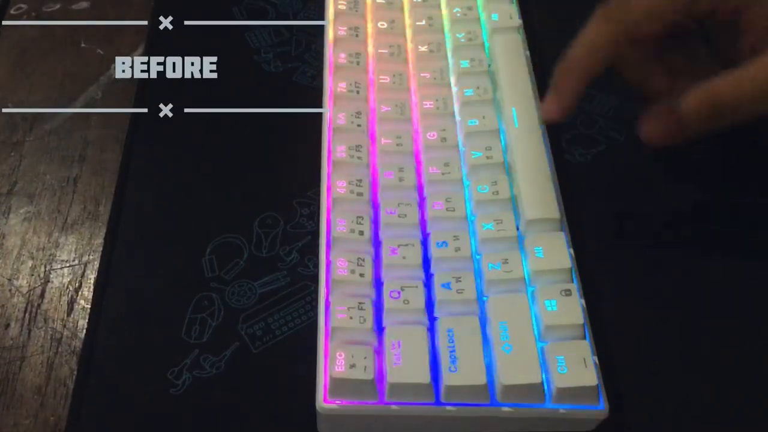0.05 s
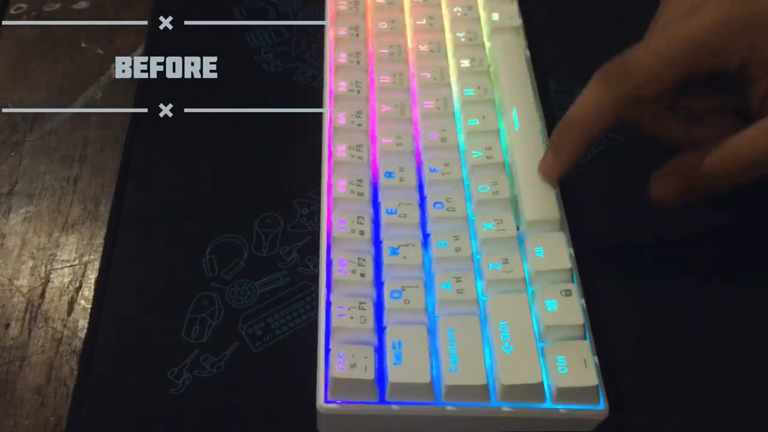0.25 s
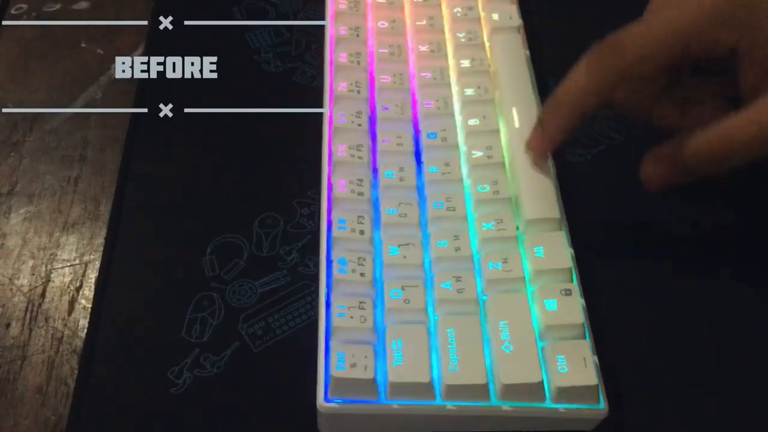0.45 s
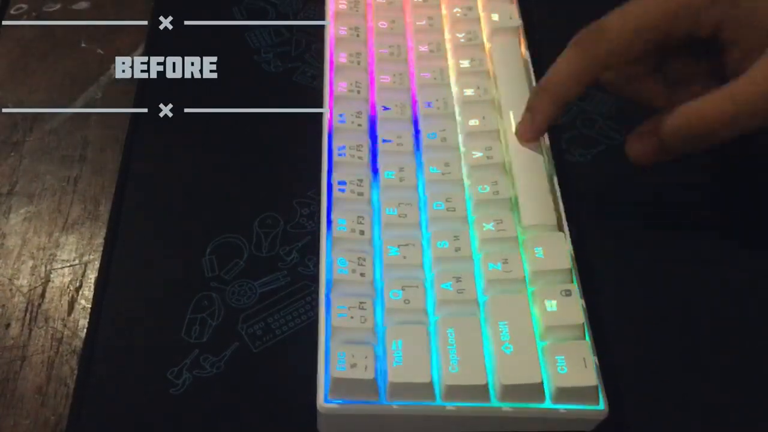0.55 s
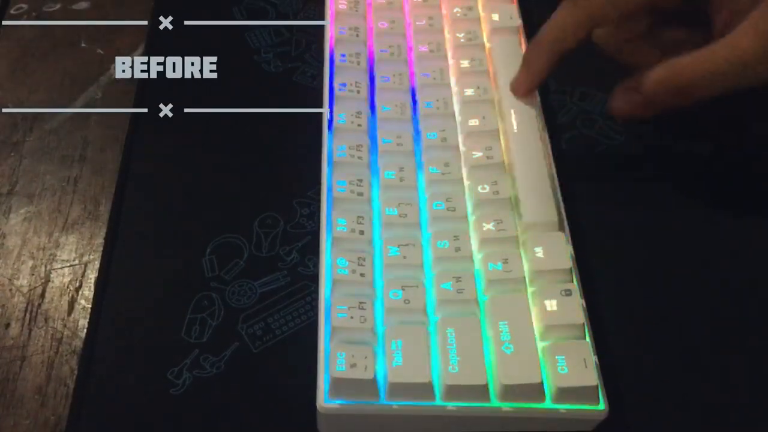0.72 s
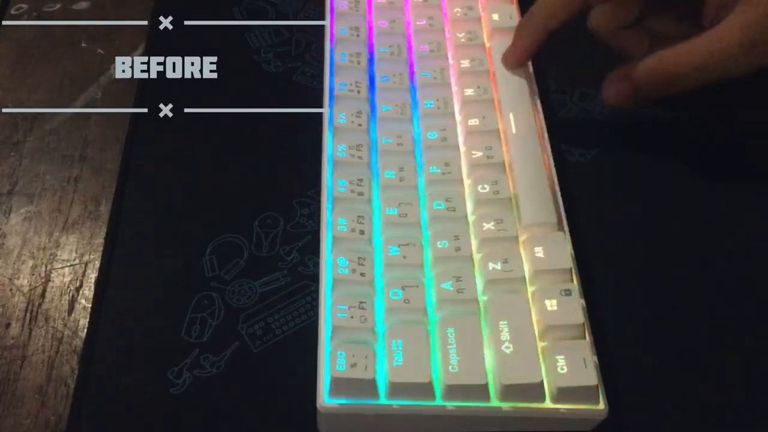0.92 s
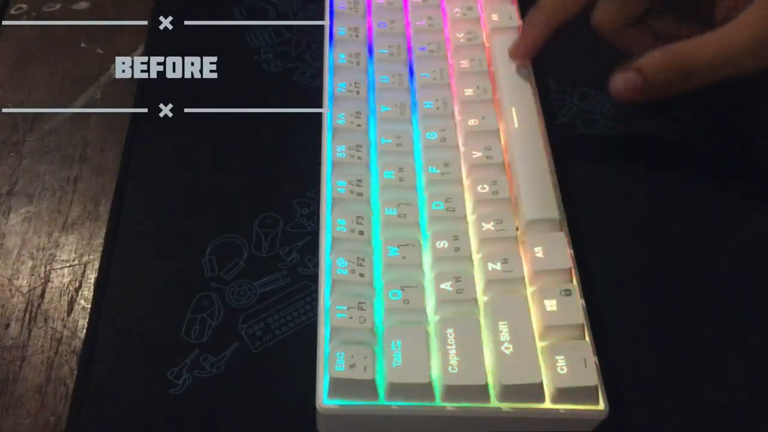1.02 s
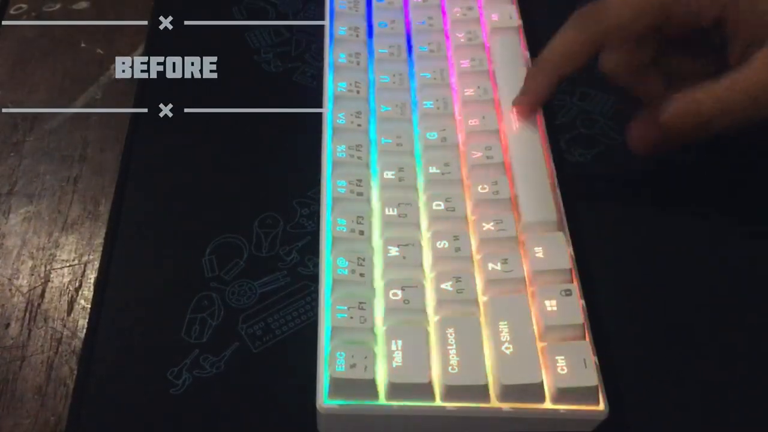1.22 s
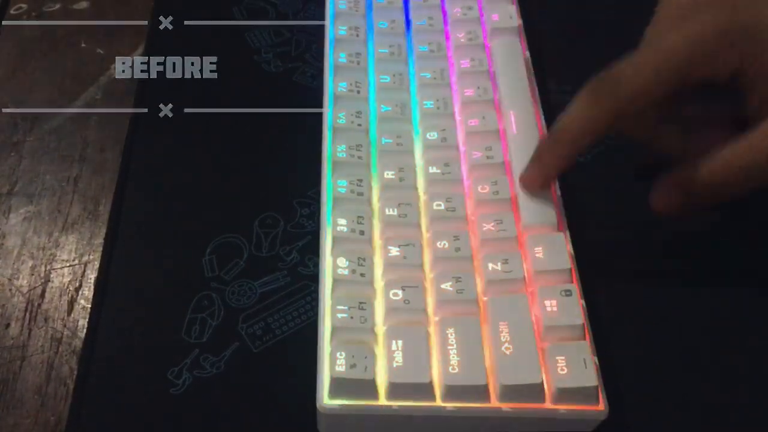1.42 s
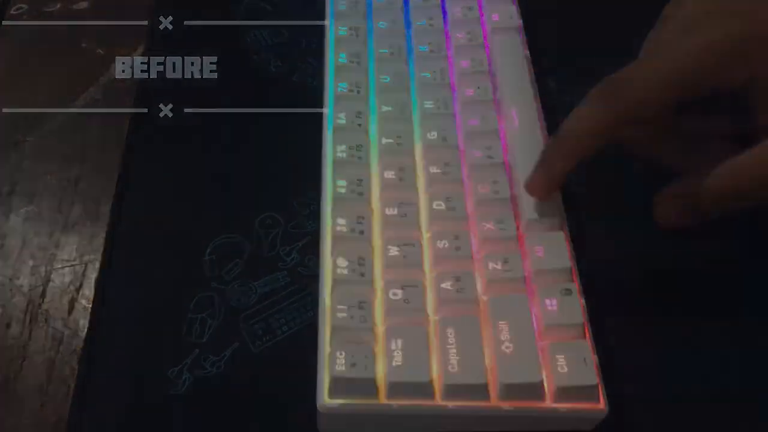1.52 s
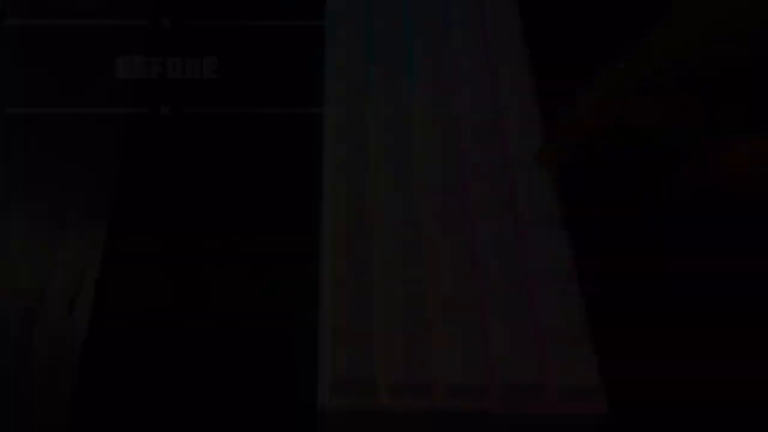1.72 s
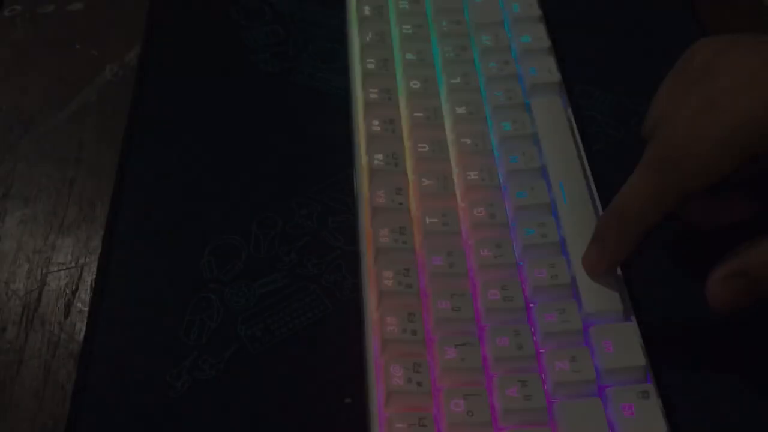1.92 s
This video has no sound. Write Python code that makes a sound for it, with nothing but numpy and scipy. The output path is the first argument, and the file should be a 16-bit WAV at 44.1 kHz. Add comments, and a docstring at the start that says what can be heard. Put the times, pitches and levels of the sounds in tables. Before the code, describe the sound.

Rapid, even clacking of a space bar on a mechanical keyboard in a quiet room.

```python
"""Space bar tapping

A finger taps a mechanical keyboard's space bar about six times a second, on a desk in a small quiet room.
The first stroke bottoms out hard and shakes the desk; later ones only click on the way down.
On each return the bar snaps against its stop, knocks the case and bounces. Low noise and hum lie beneath.
The level fades out near the end, then starts to return."""
import sys
import numpy as np
from scipy import signal
from scipy.fft import rfft, irfft, next_fast_len
from scipy.io import wavfile
from scipy.ndimage import map_coordinates

SR = 44100
rng = np.random.default_rng(int(sys.argv[2]) if len(sys.argv) > 2 else 0)


def master_out(mix):
    """Clip the mix to full scale and print it as 16-bit PCM to the path in sys.argv[1]."""
    frames = np.transpose(np.atleast_2d(mix))
    ceiling = np.clip(frames, -1, 1)
    pcm = np.round(ceiling * 32767).astype(np.int16)
    wavfile.write(sys.argv[1], SR, pcm)


N = 85995
HIT_T_S = np.arange(SR // 3) / SR  # time axis of one impact
TICK_HOLD_S, TICK_T60_S = .003, .021
LEAF_LEAD_S = .012  # switch leaf ticks ahead of the stop

# bar returns (time [s], level [dB], snap re level [dB], first flight [s], bounce re level [dB])
RETURNS = [(.2863, -20.5, -0.5, .0072, -13), (.4673, -19.5, 0, .0083, -12), (.6434, -21, 0, .0079, -11),
           (.8208, -23.5, -0.5, .0086, -4), (1.0010, -22.5, 0.5, .0083, -7),
           (1.1736, -23.5, -0.5, .0078, -9), (1.3480, -19, -.5, .0090, -7), (1.5186, -21, -1.5, .0085, -9),
           (1.6738, -22, -1, .0083, -12), (1.8660, -30, -4, .0058, -7)]
# case and plate (frequency [Hz], level [dB], t60 [s])
CASE_MODES = [(247, -22, .16), (313, -22, .12), (400, -20, .018), (610, -22, .07), (690, -9, .028),
              (724, -26, .1), (772, -18, .09), (1336, -25, .2), (1478, -16, .11), (1702, 4.5, .0135),
              (2022, -15, .07), (1931, -21.5, .07), (2141, 3.5, .017), (2472, -5.5, .04),
              (2995, -5.5, .008)]
# plastic snap (frequency [Hz], level [dB])
SNAP_SPECTRUM = [(200, -14.5), (1000, -14), (1800, 2), (3300, 2), (3900, -3), (4500, 0.5), (5000, -7.5),
                 (5400, 0), (6600, -0.5), (7400, -7.5), (8600, -6), (11000, -10), (12400, -5), (13600, -11),
                 (15500, -13)]
# light clicks (frequency [Hz], level [dB])
TICK_SPECTRUM = [(200, -12), (600, -7), (900, -10), (1400, -1), (2300, 0), (3200, 2), (4200, -1),
                 (5000, -6), (5800, -2), (7500, -7), (9000, -3), (11000, -9), (12800, -4), (15500, -10)]


def bar_returns():
    """The leaf ticks, the cap hits its stop and bounces twice; each contact knocks the case."""
    # keycap (frequency [Hz], level [dB], t60 [s])
    cap_modes = [(560, -18, .022), (1870, -2, .03), (2720, -21, .04), (3240, -6, .025), (4420, -14, .016),
                 (5400, -12, .018), (5800, -16, .016), (6480, -11, .014), (8620, -21, .015),
                 (12300, -22, .014)]
    case_lag_s = .00231
    rebound_ratio, rebound_db = .62, -6  # second bounce re first: flight time, level
    out = np.zeros(N)
    for time_s, db, snap_db, flight_s, bounce_db in RETURNS:
        leaf = chatter(TICK_SPECTRUM, TICK_HOLD_S, TICK_T60_S)
        add(out, time_s - LEAF_LEAD_S, amp(db - 29) * leaf)
        contacts = [(0, 0), (flight_s, bounce_db),
                    (flight_s * (1 + rebound_ratio), bounce_db + rebound_db)]
        for lag_s, loss_db in contacts:
            cap = ring(cap_modes) + amp(-7.5) * chatter(SNAP_SPECTRUM, hold_s=.0024, t60_s=.011)
            add(out, time_s + lag_s, amp(db + loss_db + snap_db) * cap)
            add(out, time_s + lag_s + case_lag_s, amp(db + loss_db) * ring(CASE_MODES))
    return out


def bar_presses():
    """The bar bottoms out once; bar and stabiliser wire click lightly on the way down."""
    # bar driven onto the plate (frequency [Hz], level [dB], t60 [s])
    bottom_out_modes = [(262, -16, .08), (670, -9, .028), (1150, -14, .012), (1530, -9, .035),
                        (1790, 3, .016), (2010, 2, .017), (2480, -8, .03), (2570, -14, .04),
                        (3200, -8, .018), (4300, -8, .015), (5480, -10, .015), (5880, -13, .015),
                        (6450, -11, .012), (8450, -13, .015), (12300, -10, .016)]
    # bar and wire clicks (time [s], level [dB], case knock re level [dB])
    clicks = [(.2062, -37, -1), (.2095, -43, 3), (.3738, -43, -2), (.3935, -44, 3), (.5585, -49, -12),
              (.7350, -43, -11), (.7605, -50.5, -10), (.9072, -38.5, -10), (.9130, -45, 0),
              (.9325, -49, -1), (1.0760, -47, 0), (1.1000, -53, 5), (1.1402, -52, -12), (1.2462, -46, -4.5),
              (1.2680, -55, 12), (1.4378, -40, -7), (1.4425, -45, -2), (1.4630, -48.5, -9),
              (1.5832, -36, -12)]
    out = np.zeros(N)
    bottom_out = ring(bottom_out_modes) + amp(-9.5) * chatter(SNAP_SPECTRUM, hold_s=.003, t60_s=.014)
    add(out, time_s=.2157, sound=amp(-18) * bottom_out)
    for time_s, db, knock_db in clicks:
        tick = chatter(TICK_SPECTRUM, TICK_HOLD_S, TICK_T60_S)
        add(out, time_s, amp(db) * (tick + amp(knock_db) * ring(CASE_MODES)))
    return out


def desk_thuds():
    """The desk takes the finger's push with a soft low thud."""
    # pushes into the desk (time [s], level [dB])
    pushes = [(.224, -29), (.252, -39), (.398, -37), (.430, -41), (.788, -39), (1.170, -43), (1.268, -40),
              (1.303, -39)]
    # desk (frequency [Hz], level [dB], t60 [s])
    desk_modes = [(56, -1, .24), (92, -1, .13), (145, -15, .12)]
    rise_s = .007
    onset = 1 - np.exp(-HIT_T_S / rise_s)
    out = np.zeros(N)
    for time_s, db in pushes:
        add(out, time_s, amp(db) * ring(desk_modes) * onset)
    return out


def room_reverb(x):
    """Near surfaces reflect first; the diffuse tail rings longest in the midrange."""
    # tail decay (frequency [Hz], t60 [s])
    tail_decay = [(200, 0.05), (700, 0.41), (2000, 0.47), (5000, 0.4), (12000, 0.36)]
    # tail colour (frequency [Hz], gain [dB])
    tail_spectrum = [(100, -10), (300, -9), (600, -8), (900, -14), (1150, -5), (1400, -4.5), (1700, -14),
                     (2050, -16), (2350, -9), (2600, -10), (3200, -15), (6000, -16), (14000, -14)]
    # early reflections (frequency [Hz], gain [dB])
    early_spectrum = [(300, 2), (2000, 0), (5000, -7), (14000, -5)]
    delay_s = .005
    hz, t, noise_bands = signal.stft(rng.standard_normal(SR // 2), SR, nperseg=256)
    band_t60_s = log_interp(tail_decay, hz)[:, None]
    _, tail = signal.istft(noise_bands * decay(t, band_t60_s), SR, nperseg=256)
    early = rng.standard_normal(len(HIT_T_S)) * decay(HIT_T_S, t60_s=.045)
    response = np.zeros(SR)
    add(response, delay_s, amp(-14.5) * coloured(early / np.linalg.norm(early), early_spectrum))
    add(response, 2 * delay_s, coloured(tail / np.linalg.norm(tail), tail_spectrum))
    return signal.fftconvolve(x, response)[:N]


def background():
    """Low room noise and a slightly unsteady hum, probably a fan."""
    # hum partials (frequency [Hz], rms level [dB])
    partials = [(97, -51.5), (195, -66)]
    # room noise (frequency [Hz], relative level [dB])
    noise_spectrum = [(20, -14), (35, -6), (55, 2), (75, -5), (120, -9), (150, -7.5), (175, -15), (260, -4),
                      (400, -11), (700, -13), (1100, -19), (1700, -19), (3000, -30), (6000, -42),
                      (15000, -51)]
    t = np.arange(N) / SR
    drift_rad = .5 * map_coordinates(rng.standard_normal(32), [t * 6])  # 6 random points a second
    hum = sum(amp(db) * np.sqrt(2) * np.sin(2 * np.pi * hz * t + drift_rad) for hz, db in partials)
    return hum + amp(-47) * unit_rms(coloured(rng.standard_normal(N), noise_spectrum))


def ring(modes, scatter_db=1.1):
    """Damped modes of alternating polarity; their levels vary from blow to blow."""
    hz, db, t60_s = np.transpose(modes)[:, :, None]
    gains = amp(db + scatter_db * rng.standard_normal(db.shape))
    partials = gains * decay(HIT_T_S, t60_s) * np.sin(2 * np.pi * hz * HIT_T_S)
    polarity = (-1) ** np.arange(len(modes))
    return polarity @ partials


def chatter(spectrum, hold_s, t60_s):
    """Plastic chattering on plastic: a noise burst that holds, then decays."""
    noise = unit_rms(coloured(rng.standard_normal(len(HIT_T_S)), spectrum))
    return noise * decay(HIT_T_S - hold_s, t60_s)


def amp(db):
    """Decibels to gain."""
    return 10 ** (np.asarray(db) / 20)


def unit_rms(x):
    """Scale to rms 1."""
    return x / np.sqrt(np.mean(x ** 2) + 1e-20)


def log_interp(points, hz):
    """Interpolate (frequency [Hz], value) points on a log axis."""
    point_hz, values = np.transpose(points)
    return np.interp(np.log(hz + 1), np.log(point_hz + 1), values)


def decay(t, t60_s):
    """Exponential decay, held at 1 before time 0."""
    return amp(-60 * np.maximum(t, 0) / t60_s)


def coloured(x, spectrum):
    """Filter by a (frequency [Hz], gain [dB]) curve."""
    size = next_fast_len(2 * len(x))
    gain = amp(log_interp(spectrum, np.fft.rfftfreq(size, 1 / SR)))
    return irfft(rfft(x, size) * gain, size)[:len(x)]


def add(track, time_s, sound):
    """Mix a sound into the track."""
    part = track[max(round(time_s * SR), 0):][:len(sound)]
    part += sound[:len(part)]


def scene():
    """Keyboard, desk and background; each stroke gets its own random room response."""
    keys = bar_returns() + bar_presses()
    starts_s = [time_s - LEAF_LEAD_S for time_s, *_ in RETURNS]
    stroke = np.searchsorted(starts_s, np.arange(N) / SR)
    reverb = sum(room_reverb(keys * (stroke == k)) for k in range(len(RETURNS) + 1))
    return (keys + reverb + desk_thuds() + background())[None]


def record(dry):
    """The level fades out and starts to return; a brick-wall low-pass cuts the top treble."""
    # overall fade (time [s], gain [dB])
    fade = [(1.45, -0.5), (1.6, -5.5), (1.68, -10), (1.74, -20), (1.78, -42.5), (1.82, -30), (1.87, -21),
            (1.95, -16)]
    cutoff_hz = 15850
    time_s, db = np.transpose(fade)
    faded = dry * amp(np.interp(np.arange(N) / SR, time_s, db))
    size = next_fast_len(N + SR // 2)
    passband = np.fft.rfftfreq(size, 1 / SR) < cutoff_hz
    return irfft(rfft(faded, size) * passband, size)[:, :N]


dry = scene()
out = record(dry)
master_out(out)
```